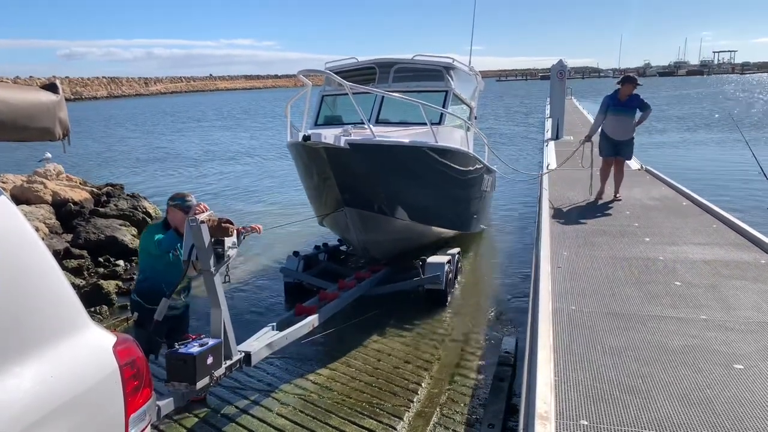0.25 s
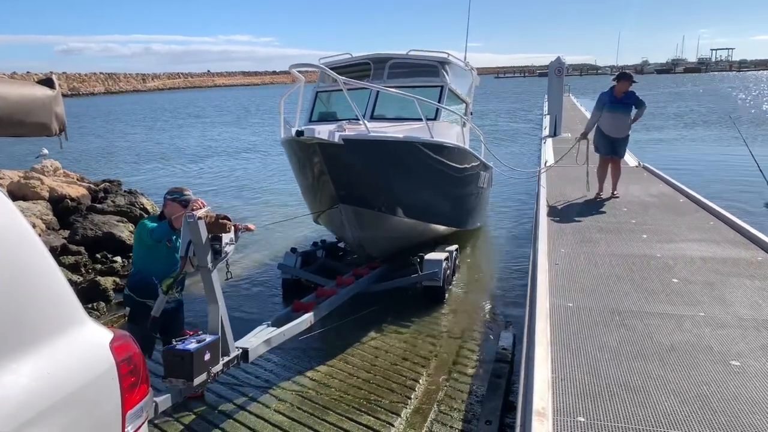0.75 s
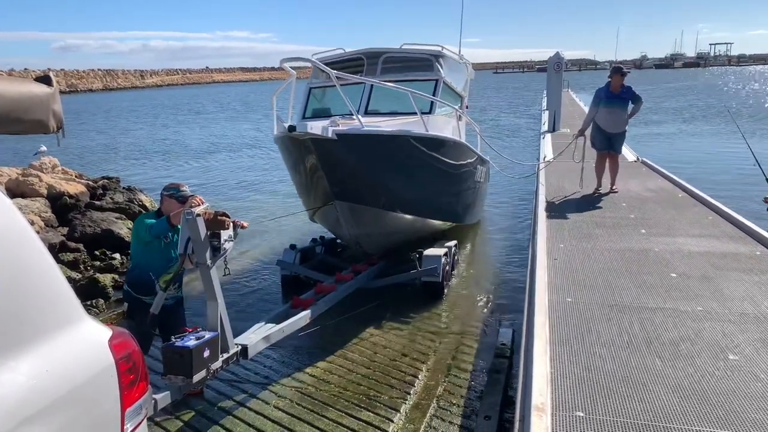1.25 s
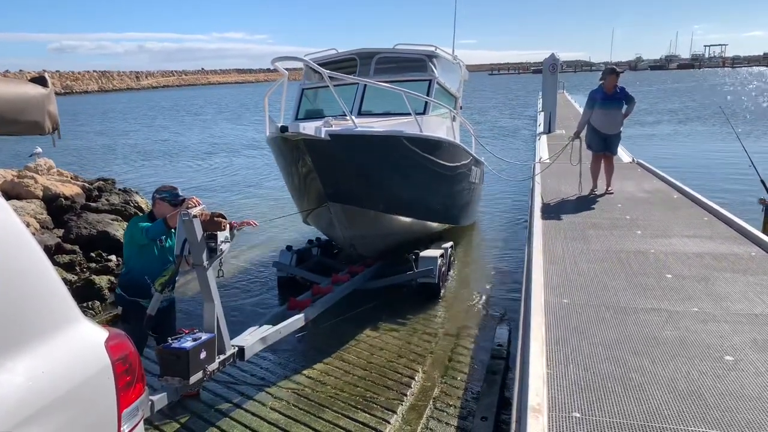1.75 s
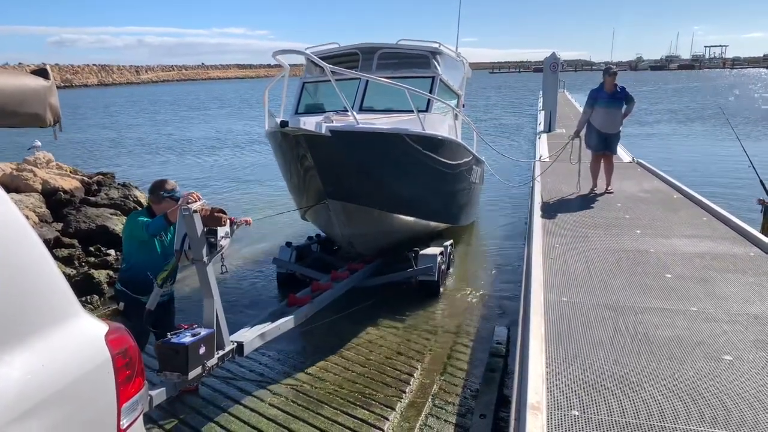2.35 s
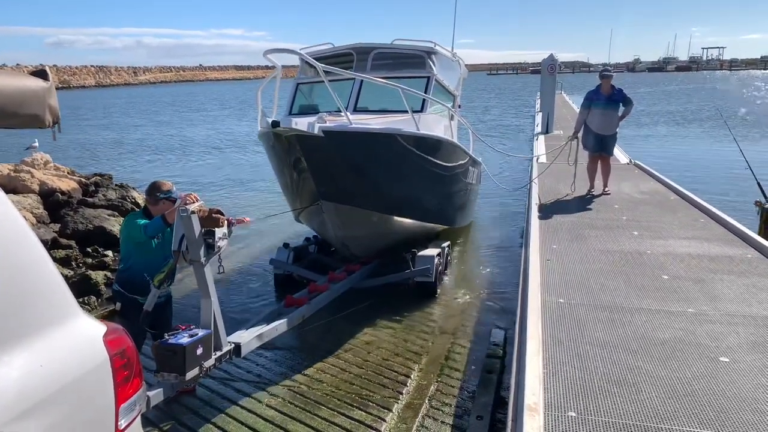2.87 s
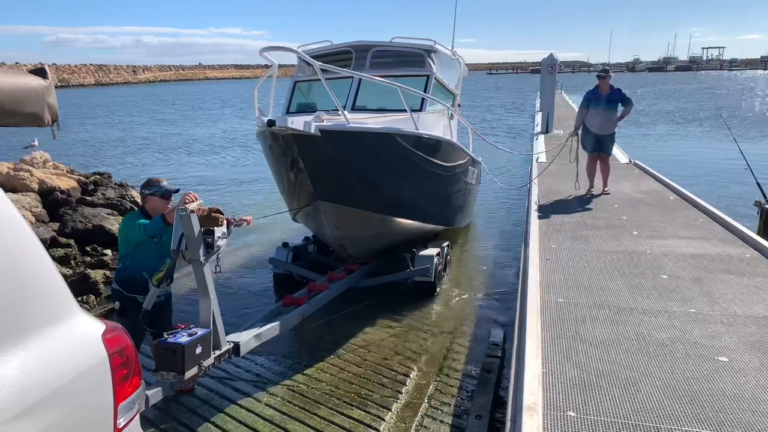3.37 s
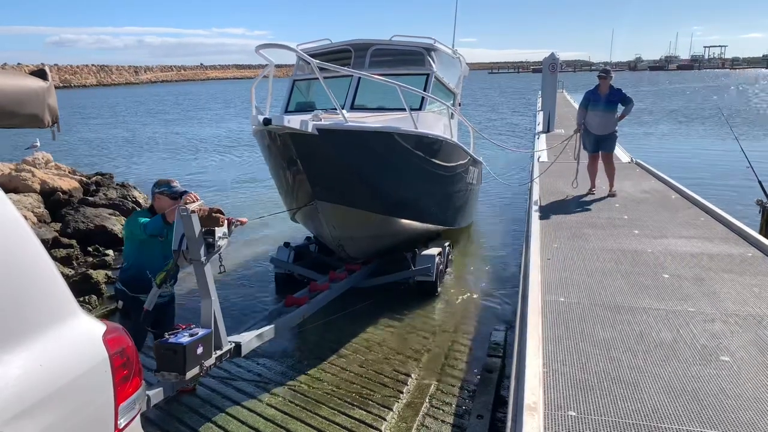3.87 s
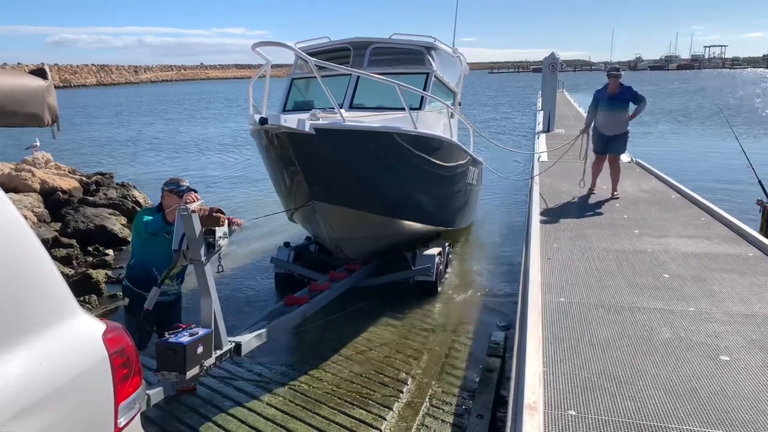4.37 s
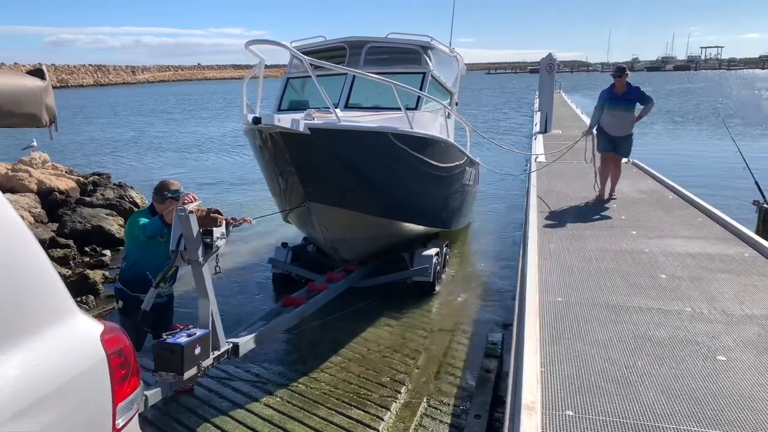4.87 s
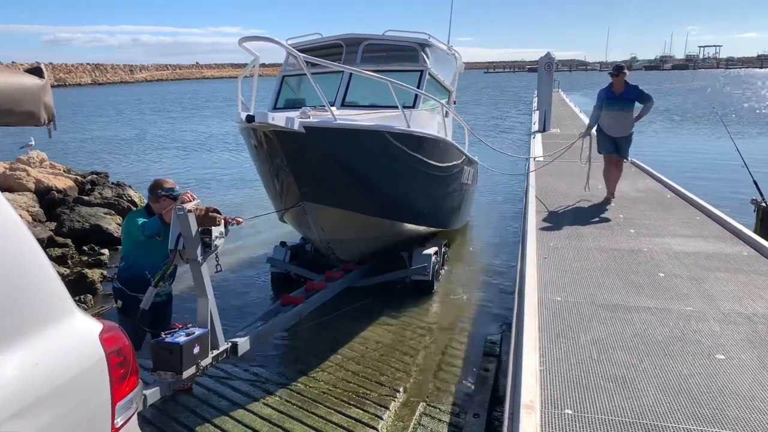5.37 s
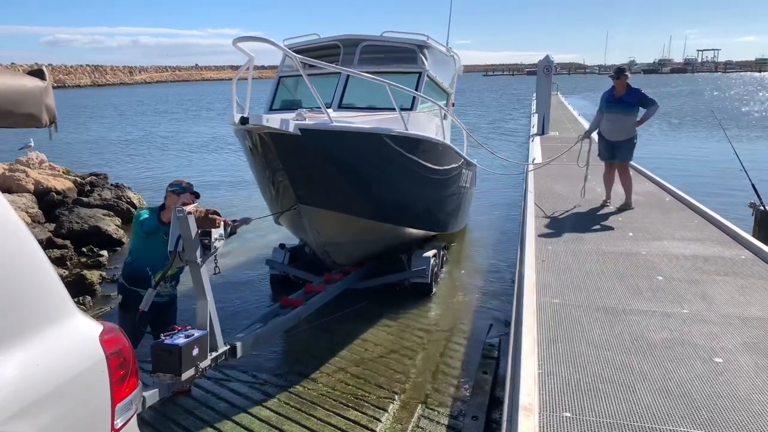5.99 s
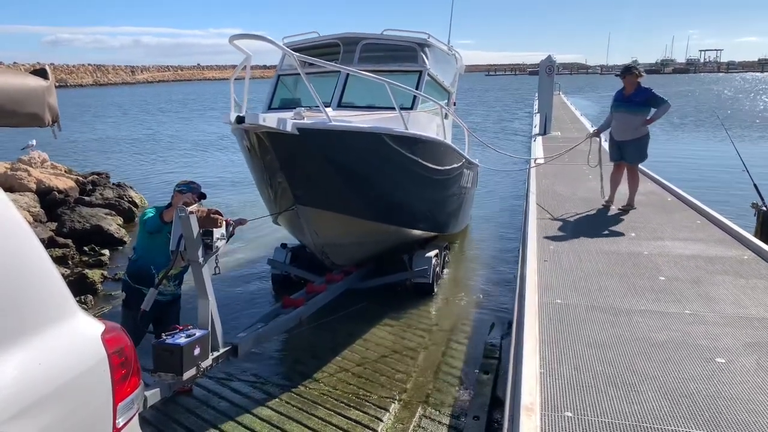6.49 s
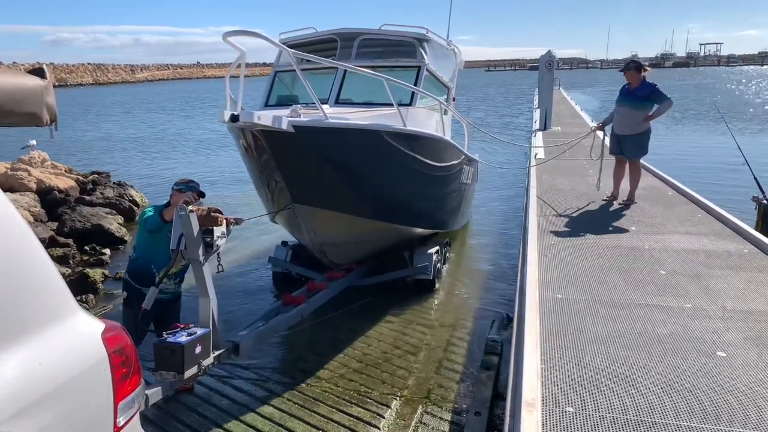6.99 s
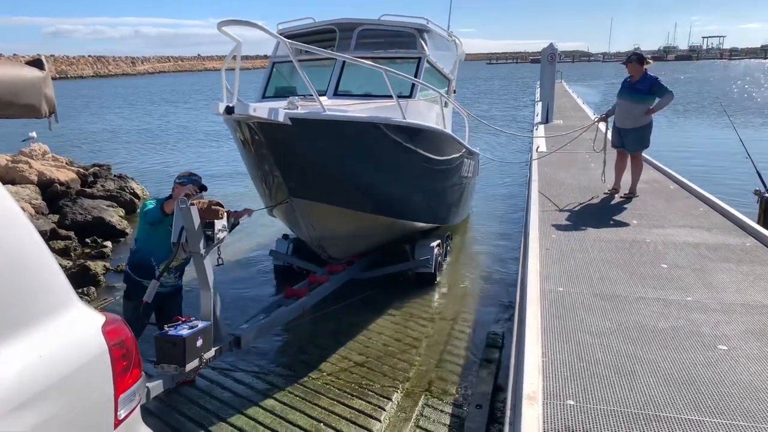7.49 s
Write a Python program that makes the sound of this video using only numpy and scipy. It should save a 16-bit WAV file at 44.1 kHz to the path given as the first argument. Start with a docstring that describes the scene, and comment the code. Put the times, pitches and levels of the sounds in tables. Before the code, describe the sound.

At an open boat ramp, a nearby electric winch runs without pause under load, a coarse fast buzz with ringing metallic gear tones, thin wavering whine and bright hiss. Its pitch sags slightly toward the end. Wind buffets the microphone in low thumps and sharp slaps, busiest in the first second and a half and around the middle. The motor briefly ducks in level a few times.

```python
"""On an open ramp an electric winch hauls a boat up while gusts buffet the microphone.
The motor rasps once a turn and slows under load: noise is modulated by the rotation and filtered by resonances.
Gear multiples ring as they near the housing's modes, and two high ones whine; shaped noise makes the
wind's low thumps, flutter and slaps. The heard level, wind aside, dips briefly at set times, chiefly below
8 kHz; the middle band swells to the right; the hiss above is nearly steady, sinking slightly."""
import sys
import numpy as np
from scipy import signal
from scipy.fft import rfft, irfft
from scipy.io import wavfile
from scipy.ndimage import uniform_filter1d, map_coordinates

SR = 44100
rng = np.random.default_rng(int(sys.argv[2]) if len(sys.argv) > 2 else 0)


def generate_wav(signal):
    """Clip the signal to [-1, 1] and save it as 16-bit WAV at the path in sys.argv[1]."""
    frames = np.transpose(np.atleast_2d(signal))
    scaled = np.clip(frames, -1, 1) * 32767
    pcm = np.round(scaled).astype(np.int16)
    wavfile.write(sys.argv[1], SR, pcm)


N = 341334   # samples
TIME = np.arange(N) / SR   # seconds
HZ = np.maximum(np.arange(N // 2 + 1) * SR / N, 1)   # bin frequencies
LEFT_LEAD_S, RIGHT_LEAD_S = 0.00015, 0.0002144   # between the ports, below and above the change of path
PATH_CHANGE_HZ, STEADY_ABOVE_HZ = 6300, 7960


def amp(db):
    """Decibel law: a level in dB becomes an amplitude ratio."""
    return 10 ** (np.asarray(db) / 20)


def rms_one(x):
    """Power normalisation: scale to a root mean square of 1."""
    return x / np.sqrt(np.mean(x ** 2) + 1e-20)


def in_time(rows):
    """Linear interpolation: table columns become curves over time."""
    s, *columns = np.transpose(rows)
    return [np.interp(TIME, s, column) for column in columns]


def at_hz(points):
    """Spectral envelope: a table interpolated over log frequency at every bin."""
    hz, values = np.transpose(points)
    return np.interp(np.log(HZ), np.log(hz), values)


def drift(rate_hz):
    """Low-passed noise: a slow random curve of rms 1, from two equal poles at the given rate."""
    step = 40   # samples between computed points
    pole = np.exp(-2 * np.pi * step * rate_hz / SR)
    settle = 2000   # points discarded while the filter settles
    noise = rng.standard_normal(N // step + settle + 2)
    slow = signal.lfilter([1], [1, -2 * pole, pole * pole], noise)[settle:]
    return np.interp(np.arange(N) / step, np.arange(len(slow)), rms_one(slow))


def below(edge_hz, order):
    """Low-pass gain; one minus it is the complementary high-pass."""
    return 1 / (1 + (HZ / edge_hz) ** order)


def tone(hz, level_db):
    """Phase accumulation: a sine of moving pitch, delayed at the right port by its extra path."""
    cycles = np.cumsum(hz) / SR
    at_ports = np.array([cycles, cycles - LEFT_LEAD_S * hz])
    return amp(level_db) * np.sqrt(2) * np.sin(2 * np.pi * at_ports)


def rotation():
    """Integrated speed gives phase: turns of the motor, gear knock rate and unit-rms knock pulses."""
    # Each row: time in seconds, motor speed in turns per second.
    speed = [(0.0, 45.88), (0.32, 46.4), (0.64, 46.34), (0.97, 45.09), (1.29, 45.54), (1.61, 46.25),
             (1.94, 45.71), (2.26, 45.36), (2.58, 45.69), (2.9, 45.8), (3.22, 44.93), (3.55, 44.94),
             (3.87, 45.53), (4.19, 45.35), (4.52, 44.58), (4.84, 44.39), (5.16, 44.18), (5.48, 44.08),
             (5.8, 43.5), (6.13, 43.02), (6.45, 43.3), (6.77, 42.75), (7.1, 42.0), (7.42, 42.11),
             (7.74, 42.37)]
    # Each row: time in seconds, gear speed in knocks per second.
    knock_rate = [(0.0, 68.4), (0.19, 69.8), (0.55, 70.3), (0.77, 69.6), (1.01, 67.6), (1.38, 69.4),
                  (1.55, 69.9), (1.94, 68.8), (2.07, 69.4), (2.2, 68.6), (2.74, 69.3), (2.99, 69.1),
                  (3.19, 67.9), (3.5, 67.9), (3.98, 69.1), (4.31, 68.4), (4.57, 67.1), (4.68, 67.4),
                  (5.0, 67.2), (5.09, 66.4), (5.45, 66.8), (6.03, 65.6), (6.08, 64.9), (6.7, 66.1),
                  (6.88, 64.0), (7.1, 63.4), (7.44, 63.9), (7.65, 64.5), (7.74, 65.0)]
    first_turn = -.02   # share of a turn at the start
    turns = first_turn + np.cumsum(in_time(speed)[0]) / SR
    knock_hz = in_time(knock_rate)[0]
    knocks = rms_one(np.diff(np.floor(np.cumsum(knock_hz) / SR), prepend=0))
    return turns, knock_hz, knocks


def heard_level():
    """Amplitude envelope: reference level with sag and swell, lean to the left, and dips, all in dB."""
    # Balance of the bright middle. Each row: time in seconds, nominal left minus right in dB.
    lean = [(0.0, 2), (0.39, -5.5), (0.58, 0), (0.67, -2.5), (0.77, 1), (0.99, -4.5), (1.27, 1),
            (1.79, 0.5), (2.2, 0.5), (2.24, -4), (2.76, -4), (2.85, 1), (3.06, -0.5), (3.17, -5.5),
            (3.3, 2), (3.41, 0), (3.47, -3.5), (4.07, -2.5), (4.31, 1), (4.42, -4.5), (4.5, -3),
            (4.66, -6.5), (5.0, -1), (5.78, -3.5), (5.89, 1), (6.25, -0.5), (6.32, -6.5), (6.4, 1.5),
            (7.63, 1.5), (7.74, -1)]
    # Brief dips of the heard level. Each row: time in seconds when the fall is complete,
    # length of the fall in seconds, hold in seconds, depth in dB, recovery time constant in seconds.
    dips = [(1.183, 0.0062, 0.0071, 13, 0.016), (1.245, 0.02, 0.021, 6, 0.024),
            (2.804, 0.021, 0.11, 3, .03), (3.319, 0.008, 0.0078, 8, 0.0033),
            (3.318, 0.014, 0.039, 9, 0.042), (3.546, 0.0086, 0.0055, 8, 0.0079),
            (4.203, 0.063, 0.073, 1, 0.021), (5.855, 0.034, 0.37, 2.5, 0.025),
            (6.847, 0.078, 0.2, 13, 0.012), (6.928, 0.095, 0.04, 6, 0.044),
            (7.37, 0.022, 0.032, 6.5, 0.011)]
    start_db, sag_db_per_s = -28.0, 0.23   # it sinks as the motor slows
    swell_per_lean = 0.63   # dB gained for each dB of lean to the right
    lean_db = in_time(lean)[0]
    level_db = start_db - sag_db_per_s * TIME - swell_per_lean * lean_db
    dip_db = np.zeros(N)
    for s, onset, hold, depth_db, recovery in dips:
        falling = np.clip((TIME - s) / onset + 1, 0, 1)
        recovering = np.exp(-np.clip(TIME - s - hold, 0, 2) / recovery)
        dip_db += depth_db * falling * recovering
    return level_db, lean_db, dip_db


def once_a_turn(turns, burst_db, fade):
    """Amplitude modulation by a tight spot on the rotor: a jump each turn, fading in shares of a turn."""
    shifted = turns + 1   # keeps the turn index from going negative
    strengths = np.exp(rng.normal(0, 0.19, int(shifted[-1]) + 2))
    strength = strengths[shifted.astype(int)]
    burst = amp(burst_db) * strength * np.exp(-(shifted % 1) / fade)
    return 1 + uniform_filter1d(burst, size=40)


def housing():
    """Modal superposition: left and right response as a flat path plus every resonance."""
    # Modes of housing and frame. Each row: frequency in Hz, width in Hz, left and right gain in dB
    # that the mode alone would give at its centre.
    resonances = [(316, 25, 5.5, 5), (385.6, 11, 7.5, 7.5), (642, 53, -9, 15.5), (830, 42, 12, -18),
                  (993, 41.5, 11, 14), (1112, 10.2, 17.5, 18), (1515, 35, 11, 9), (1650, 50, 9, 4.5),
                  (1881, 54, 10.5, 12), (2166, 33, 3, 7.5), (2435, 49, 13, 13.5), (2510, 21, 6, 6),
                  (2595, 31.5, 13.5, 14), (2760, 42, -2, 0.5), (2900, 23, 10.5, 11), (3120, 31, 14, 14.5),
                  (3377, 58, 10, 9), (3555, 58, 5.5, 8), (3700, 46, 3.5, -1), (3850, 30, 5.5, 8.5),
                  (3955, 21, 13.5, 4.5), (4140, 41, 6, 11), (4370, 122, 9.5, 8.5), (4700, 136, 3.5, 8),
                  (4810, 72, -9, 3.5), (5545, 63, 9, 7.5), (5850, 71, 4, 11), (6360, 27, 17.5, 8.5),
                  (8100, 75, 7, 1.5), (8370, 76, -1.5, 0), (13750, 77, 15, 14.5)]
    out = np.ones((2, len(HZ)), complex)
    for hz, width_hz, left_db, right_db in resonances:
        peak = 1j * width_hz * HZ / (hz ** 2 - HZ ** 2 + 1j * width_hz * HZ)
        out += (amp([[left_db], [right_db]]) - 1) * peak
    return out


def rasp(knocks, gate, grit_db, knock_db):
    """Partial coherence: gritty brush and bearing noise plus knocks, shared or separate at two ports."""
    # Likeness of the ports. Each row: frequency in Hz, share of power common to both (0 to 1).
    likeness = [(250, 1), (350, 1), (650, 0.47), (950, 0.77), (1250, 0.31), (1550, 0.54), (1900, 0.67),
                (2200, 0.5), (2700, 1), (3200, 1), (3620, 0.15), (3900, 0.36), (4300, 0.59), (4900, 0.49),
                (5330, 0.36), (5800, 0.56), (6200, 0.63), (6700, 1), (7400, 1), (7900, 1), (9000, 0.98),
                (9600, 0.68), (10400, 0.93), (11100, 1), (12000, 1), (12700, 0.23), (13500, 1), (14400, 1),
                (15100, .5), (15700, 1)]
    grit = amp(grit_db * np.minimum(rng.exponential(1, N), 5))
    noise = rng.standard_normal((3, N)) * gate * grit
    knock_gain = amp(knock_db + 2.2 * drift(15.0))
    shared = rfft(rms_one(noise[0]) + knock_gain * knocks)
    own = rfft(rms_one(noise[1:]))
    alike = at_hz(likeness)
    # the left port leads below the change of path, the right port above it
    low = below(PATH_CHANGE_HZ, order=40)
    left = low + (1 - low) * np.exp(-2j * np.pi * HZ * RIGHT_LEAD_S)
    right = low * np.exp(-2j * np.pi * HZ * LEFT_LEAD_S) + (1 - low)
    at_ports = np.sqrt(alike) * shared * np.array([left, right]) + np.sqrt(1 - alike) * own
    return at_ports * housing()


def patchy(spectrum, patch_db):
    """Time-frequency modulation: narrow stretches of the sound swell and sink on their own."""
    patch_s, patch_hz = 0.13, 130   # spacing of the random gains
    cells = signal.stft(irfft(spectrum, N), nperseg=1024)[2]
    field = rng.standard_normal((int(SR / 2 / 40), int(N / SR / .04)))
    pitch = np.arange(cells.shape[1]) * SR / 1024 / patch_hz
    time = np.arange(cells.shape[2]) * 512 / SR / patch_s
    places = np.meshgrid(pitch, time, indexing="ij")
    gain = amp(patch_db * map_coordinates(field, places, order=3))
    return signal.istft(cells * gain, nperseg=1024)[1][:, :N]


def winch_body(turns, knocks, rattle):
    """Band-wise excitation: hum, rattle, tick and thud are coloured, then split into middle and rest."""
    # Broad colour of the winch. Each row: frequency in Hz, relative spectral level in dB per Hz.
    colour = [(200, -25.5), (330, 1), (480, -26.5), (650, -12.5), (745, -16.5), (900, -10), (1250, -14),
              (1750, -3), (2030, -7.5), (2300, -4), (2700, -3.5), (4400, -3.5), (5800, -5.5), (6150, -10),
              (6500, -30.5)]
    # Low hum around 330 Hz. Each row: time in seconds, gain in dB within the body.
    low_hum = [(0, 0.5), (1.8, 1), (2.5, 4.5), (2.95, 1), (4.2, -1), (4.7, 6), (5.2, 0), (5.7, 5.5),
               (5.95, -4.5), (7.74, -3.5)]
    low_hum_top_hz, patch_db = 450, 2.2
    tick_db, thud_db = -2.0, -3.0   # against the steady rasp
    thud_late_turns = .13   # the duller answer of the frame comes after the tick
    hum = rasp(knocks, once_a_turn(turns, burst_db=-7.0, fade=1.0), grit_db=1.0, knock_db=-20.0)
    strikes = rms_one(np.diff(np.floor(turns - .02), prepend=-1))
    tick = rasp(strikes, once_a_turn(turns, burst_db=24.0, fade=0.1), grit_db=1.5, knock_db=-1.0)
    thud_gate = once_a_turn(turns - thud_late_turns, burst_db=18.0, fade=0.14)
    thud = rasp(knocks, thud_gate, grit_db=1.5, knock_db=-40.0)
    dull = below(2960, order=6)
    tick_band = (1 - below(3850, order=6)) * below(5800, order=8)
    thud_band = (1 - below(1450, order=12)) * below(2070, order=12)
    body = hum * dull + rattle * (1 - dull)
    body = body + amp(tick_db) * tick * tick_band + amp(thud_db) * thud * thud_band
    body = body * amp(at_hz(colour)) * below(PATH_CHANGE_HZ, order=40)
    scale = np.std(irfft(body, N))
    bright = (1 - below(1930, order=6)) * below(5900, order=16)
    low = below(low_hum_top_hz, order=10)
    middle = patchy(body * bright, patch_db) / scale
    rest = patchy(body * (1 - bright) * (1 - low), patch_db) / scale
    rest = rest + amp(in_time(low_hum)[0]) * irfft(body * low, N) / scale
    return middle, rest


def winch_hiss(turns, knocks, rattle, calm_db):
    """Broadband radiation: high rasp whose lower edge follows the heard level while the top stays steadier."""
    # Colour of the hiss. Each row: frequency in Hz, relative spectral level in dB per Hz.
    hiss_colour = [(6000, -4), (7900, -4), (8100, -1), (9000, -2), (10000, -7), (11000, -9), (13000, -9),
                   (13450, -12), (14300, -10), (16000, -12)]
    start_db, sag_db_per_s, patch_db = -28.0, 0.11, 1.8
    sheen = rasp(knocks, once_a_turn(turns, burst_db=6.0, fade=0.28), grit_db=2.5, knock_db=-40.0)
    under_sheen = below(12000, order=20)
    top = (rattle * under_sheen + sheen * (1 - under_sheen)) * amp(at_hz(hiss_colour))
    top = top * (1 - below(PATH_CHANGE_HZ, order=40))
    lower = below(STEADY_ABOVE_HZ, order=200)
    hiss = patchy(top * (1 - lower), patch_db)
    edge = irfft(top * lower, N) / np.std(hiss) * amp(calm_db - 1.5)
    hiss_db = start_db - sag_db_per_s * TIME + 1.2 * drift(4.7)
    return edge + amp(hiss_db) * rms_one(hiss)


def gear_tones(knock_hz, calm_db):
    """Resonance: multiples of the wandering knock rate sing louder the closer they come to a mode."""
    # Modes that sing. Each row: frequency in Hz, width in Hz, level in dB against the winch reference
    # before the side gains, fading in dB per second, left gain in dB, right gain in dB.
    singing_modes = [(385.9, 8.9, -19, 2.5, 20, 7), (641.2, 17.7, -10, 0.47, 7, -11),
                     (680.5, 30, -14.5, 3, -10.5, 6), (833, 48, -10.5, 1.16, -3.5, -0.5),
                     (1121.3, 16, -18.5, -0.5, 1.5, -2.5), (1300, 43, -28.5, 0.5, 9, -12),
                     (1523, 29, -12.5, 0.67, 3.5, 0.5), (2560, 46, -18.5, -1, -21.5, 1.5),
                     (2920, 9.7, -42, -4, -26, -2)]
    waver_db = 4.0   # greatest departure either way
    out = np.zeros((2, N))
    for hz, width_hz, level_db, fading_db, left_db, right_db in singing_modes:
        first = np.round(hz / knock_hz.max())
        for multiple in np.arange(first, hz / knock_hz.min() + .5):
            near = 1 / (1 + (2 * (multiple * knock_hz - hz) / width_hz) ** 2)
            sung_hz = multiple * knock_hz * (1 + 0.00092 * drift(22.7))
            sung_db = calm_db + level_db - fading_db * TIME + waver_db * np.tanh(drift(18.6))
            out += near * tone(sung_hz, sung_db) * amp([[left_db], [right_db]])
    return out


def whine(knock_hz, calm_db, gate):
    """Gear harmonics: two high multiples of the knock come and go, throbbing with the turns."""
    # Harmonic numbers of the two whines, in multiples of the knock rate.
    multiples = (80, 120)
    # One row for each whine: left gain in dB, right gain in dB.
    sides = [(-11, 8), (0, -8)]
    # Each row: time in seconds, then lower and upper whine in dB against the winch reference,
    # before the side gains.
    whine_levels = [(0, -24, -30), (0.15, -23, -30), (0.9, -16, -28), (1.2, -26, -28), (1.5, -17, -22),
                    (1.9, -13, -18), (2.1, -26, -20), (2.3, -11.5, -13), (2.8, -15, -11), (3.1, -18, -16),
                    (3.4, -18, -24), (3.6, -20, -15), (4.0, -17, -24), (4.4, -20, -15), (4.9, -15, -28),
                    (5.3, -30, -32), (7.74, -34, -34)]
    waver_db = 5.0   # greatest departure either way
    throb = rms_one(gate)
    out = np.zeros((2, N))
    for multiple, sides_db, level_db in zip(multiples, sides, in_time(whine_levels)):
        wobble = 1 + .0018 * drift(40.0)
        sung_db = calm_db + level_db + waver_db * np.tanh(drift(9.0))
        out += tone(multiple * knock_hz * wobble, sung_db) * throb * amp(sides_db)[:, None]
    return out


def winch():
    """Superposition of body, hiss and gear tones; the bright middle swells most, and on the right."""
    turns, knock_hz, knocks = rotation()
    level_db, lean_db, dip_db = heard_level()
    dull_dip_share = 0.89   # outside the bright middle the dips are shallower
    calm_db = level_db + 0.047 * lean_db - dull_dip_share * dip_db   # and the swell slightly smaller
    rattle = rasp(knocks, once_a_turn(turns, burst_db=5.5, fade=0.81), grit_db=1.5, knock_db=-30.0)
    middle, rest = winch_body(turns, knocks, rattle)
    balance = amp(np.array([0.38 * lean_db, -.7 * lean_db]))
    body = amp(level_db - dip_db + 2.5) * middle * balance + amp(calm_db + 2.5) * rest
    hiss = winch_hiss(turns, knocks, rattle, calm_db)
    whines = whine(knock_hz, calm_db, once_a_turn(turns, burst_db=6.0, fade=.3))
    return body + hiss + gear_tones(knock_hz, calm_db) + whines


def gust_levels():
    """Incoherent addition: thump and flutter gains of all gusts add in power over a breeze."""
    # Gusts on the microphone. Each row: start of the hold in seconds, hold in seconds,
    # thump level in dB before random wander, flutter in dB above the thump.
    gusts = [(0.07, 0.04, -27, -8), (0.193, 0.087, -37, -16), (0.378, 0.017, -23, -2.5),
             (0.405, 0.087, -24.5, -3.5), (0.544, 0.15, -30, -11), (0.851, 0.081, -28.5, -6),
             (1.025, 0.11, -33.5, -7.5), (1.18, 0.031, -25, -24), (1.213, 0.016, -23, -4.5),
             (1.294, 0.05, -25, -13), (1.382, 0.064, -32.5, 3.5), (2.295, 0.25, -41.5, -7),
             (2.55, 0.07, -37, -17), (2.655, 0.091, -23.5, -9.5), (3.163, 0.07, -34, -1.5),
             (3.278, 0.012, -22.5, -2), (3.445, 0.037, -18.5, -3), (3.559, 0.058, -19, -2.5),
             (3.655, 0.11, -26, 0.5), (3.76, 0.035, -22, -8), (4.03, 0.081, -31.5, -26),
             (4.116, 0.03, -34, -4), (4.192, 0.0073, -30.5, -13), (4.474, 0.01, -33, -12),
             (4.622, 0.069, -25, -4.5), (4.833, 0.04, -28, -11), (4.937, 0.058, -35, -10),
             (5.143, 0.036, -40, -13), (5.7, 0.014, -32, -11), (5.763, 0.056, -25.5, -11),
             (6.343, 0.032, -31, -5.5), (6.468, 0.077, -21, -4.5), (6.672, 0.077, -25, -3),
             (6.774, 0.012, -24.5, 3), (6.849, 0.026, -28, -7.5), (6.98, 0.013, -30, -8.5),
             (7.077, 0.016, -23, -23), (7.098, 0.026, -37, 0), (7.18, 0.016, -28, -12),
             (7.32, 0.053, -37, -12), (7.473, 0.028, -30, -9), (7.564, .18, -66, -18)]
    rise_db_per_s, fall_db_per_s = 283, 312
    breeze_db, breeze_flutter_db = -47.5, -20   # between gusts; the flutter is against the thump
    t = np.arange(0, N, 32) / SR
    s, hold, thump_db, flutter_db = np.transpose(gusts)[:, :, None]
    rise = rise_db_per_s * np.maximum(s - t, 0)
    fall = fall_db_per_s * np.maximum(t - s - hold, 0)
    shape_db = thump_db - rise - fall
    thump_power = np.sum(amp(2 * shape_db), axis=0) + amp(2 * breeze_db)
    flutter_power = np.sum(amp(2 * (shape_db + flutter_db)), axis=0)
    flutter_power = flutter_power + amp(2 * (breeze_db + breeze_flutter_db))
    return [np.interp(TIME, t, np.sqrt(power)) for power in (thump_power, flutter_power)]


def slaps():
    """Impulsive pressure: each slap is a decaying burst of low noise with a brighter edge at its start."""
    # Sharp slaps of wind. Each row: start in seconds, body peak in dB before a common 8.5 dB cut,
    # edge in dB against the body before a common 6 dB lift, frequency in Hz that scales band and decay.
    slap_rows = [(0.353, -10, -20, 200), (0.409, -11, -24, 298), (0.438, -9, -11, 350),
                 (0.574, -14.5, -9, 250), (0.833, -21, -7, 350), (1.033, -12.5, -17, 150),
                 (1.175, -16, -35, 80), (1.169, -8, -14, 308), (1.21, -12.5, -7, 350),
                 (1.23, -14, -17, 140), (1.302, -8, -14, 357), (1.361, -7.5, -18, 352),
                 (1.413, -15, -15, 350), (2.687, -19, -20, 250), (3.273, -25.5, 6, 300),
                 (3.283, -16, -32, 131), (3.449, -3.5, -30, 160), (3.46, -1.5, -25, 386),
                 (3.569, -7, -29, 393), (3.59, -6.5, -30, 170), (3.683, -13, -22, 200),
                 (3.713, -10, -30, 346), (3.731, -29, -24, 396), (3.803, -9, -25, 302),
                 (5.807, -7, -25, 124), (6.442, -15, -20, 200), (6.46, -13, -25, 140),
                 (6.54, -19, -28, 140), (6.499, -10, -8.5, 300), (6.701, -13.5, -7, 350),
                 (6.768, -13.5, -9, 348), (6.875, -6.5, -33, 73), (7.057, -19, -35, 75),
                 (7.042, -26, -21, 250), (7.075, -15.5, -10, 254), (7.461, -19.5, -25, 220)]
    decay_cycles = 1.6
    edge_band = signal.butter(2, [600, 1400], "band", fs=SR, output="sos")
    out = np.zeros(N)
    age = np.arange(SR // 10) / SR
    for s, peak_db, edge_db, hz in slap_rows:
        noise = rng.standard_normal((2, len(age)))
        body_band = signal.butter(2, [hz / 2.0, hz * 1.38], "band", fs=SR, output="sos")
        body = signal.sosfilt(body_band, noise[0] * np.exp(-age * hz / decay_cycles))
        edge = signal.sosfilt(edge_band, noise[1] * np.exp(-age / 0.0061))
        burst = body / np.abs(body).max() + amp(edge_db + 6.0) * edge / np.abs(edge).max()
        start = round(s * SR)
        out[start:start + len(age)] += amp(peak_db - 8.5) * burst
    return out


def wind():
    """Turbulent pressure: eddies at the ports give lumpy low noise, with higher flutter in strong gusts."""
    # Colour of the thumps. Each row: frequency in Hz, relative spectral level in dB per Hz.
    thump_colour = [(15, -43), (28, -11), (55, 7), (110, 2), (200, -7), (400, -76)]
    # Colour of the flutter. Each row: frequency in Hz, relative spectral level in dB per Hz.
    flutter_colour = [(100, -12.5), (200, 4), (430, -4), (670, -9), (740, -21.5), (1500, -23), (2500, -66)]
    thump_gain, flutter_gain = gust_levels()
    white = rng.standard_normal((3, N))
    thump = rms_one(irfft(rfft(white[0]) * amp(at_hz(thump_colour)), N))
    thump = thump * thump_gain * amp(2.0 * drift(28.0))
    lumps = amp(9.7 * np.tanh(drift(20.5)))
    flutter = rms_one(irfft(rfft(white[1:] * lumps) * amp(at_hz(flutter_colour)), N))
    # a common part plus a weaker part of opposite sign at the two ports
    flutter = flutter[0] + amp(-13.0) * flutter[1] * [[1], [-1]]
    return thump + flutter * flutter_gain + slaps()


def scene():
    """Linear superposition of winch and wind."""
    return winch() + wind()


def record(dry):
    """Mid-side filtering: the bass is alike in both channels up to a shifting edge; the top is cut."""
    # Each row: time in seconds, share of the wide mono edge (0 to 1).
    mono_wide = [(0, 1), (1.4, 1), (2.35, 0.31), (3.8, 0), (4.0, 0.68), (5.3, 0.33), (5.5, 0), (6.6, 0),
                 (7.0, 1), (7.74, 1)]
    mid, side = (dry[0] + dry[1]) / 2, rfft(dry[0] - dry[1]) / 2
    narrow = irfft(side * (1 - below(270, order=16)), N)   # mono below 270 Hz
    wide = irfft(side * (1 - below(800, order=16)), N)   # mono below 800 Hz
    side = narrow + in_time(mono_wide)[0] * (wide - narrow)
    top_cut = signal.ellip(12, .5, 70, 15750, fs=SR, output="sos")   # low-pass at 15750 Hz
    return signal.sosfilt(top_cut, [mid + side, mid - side])


dry = scene()
out = record(dry)
generate_wav(out)
```